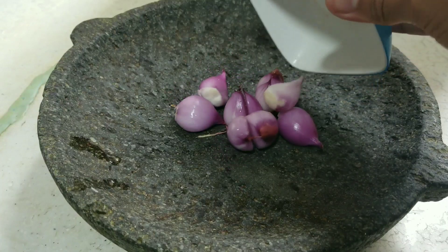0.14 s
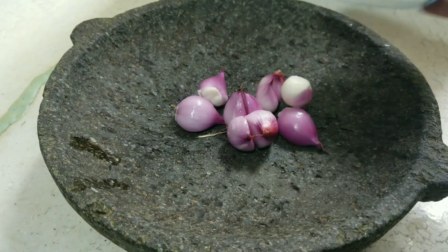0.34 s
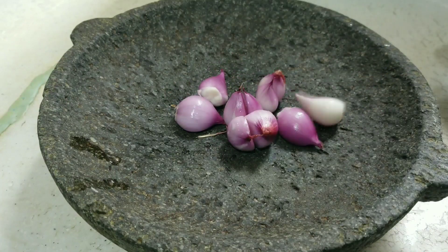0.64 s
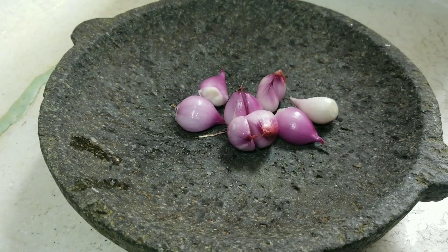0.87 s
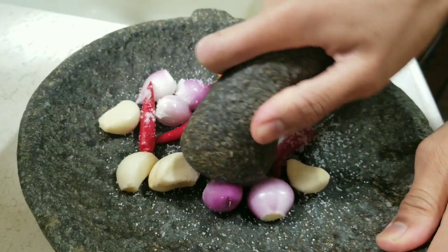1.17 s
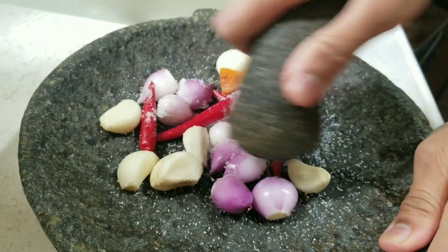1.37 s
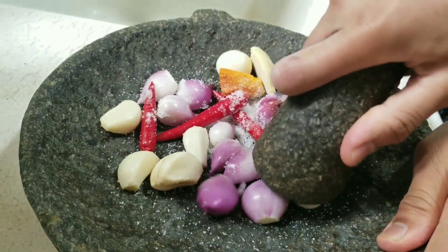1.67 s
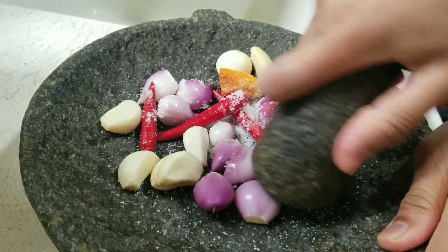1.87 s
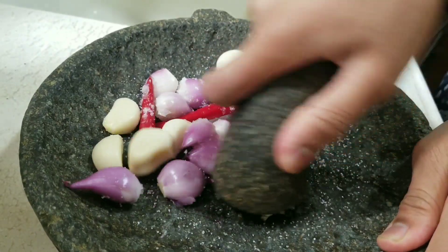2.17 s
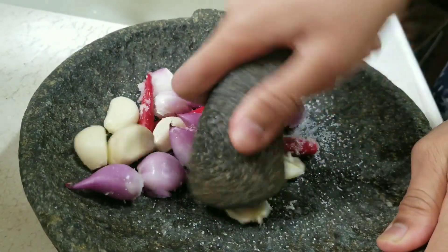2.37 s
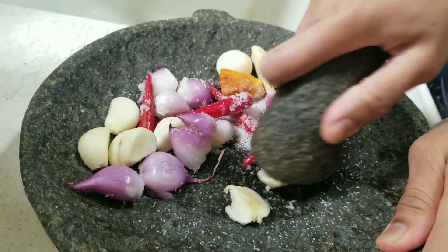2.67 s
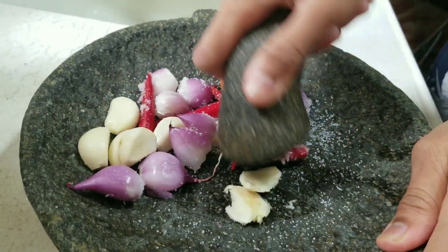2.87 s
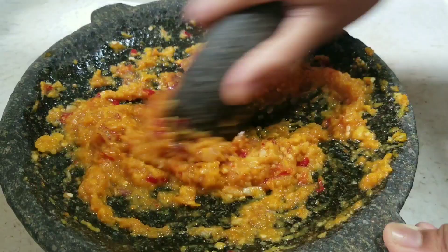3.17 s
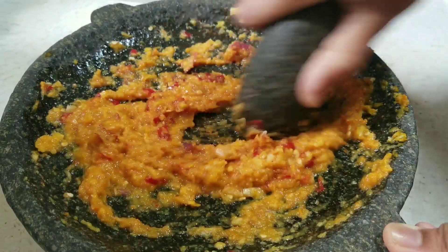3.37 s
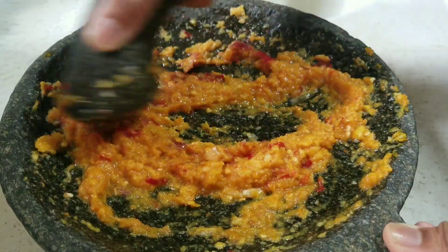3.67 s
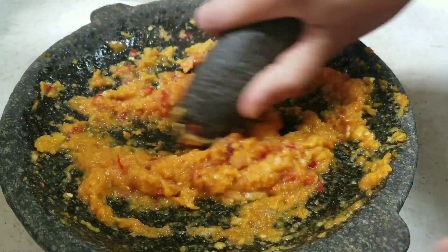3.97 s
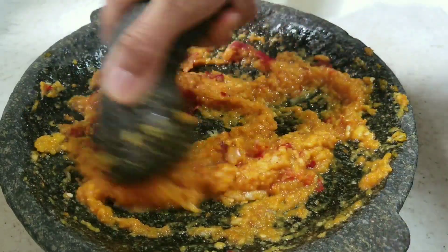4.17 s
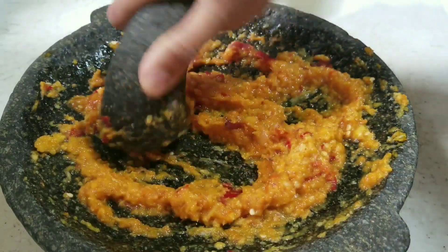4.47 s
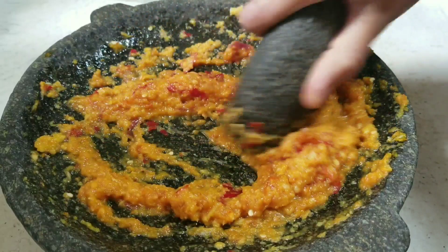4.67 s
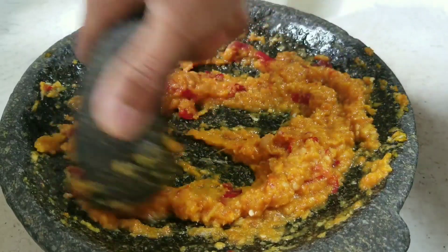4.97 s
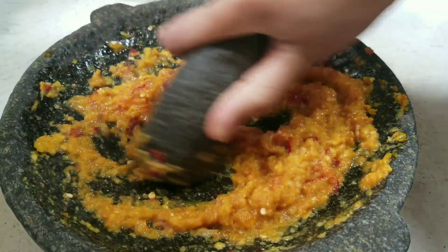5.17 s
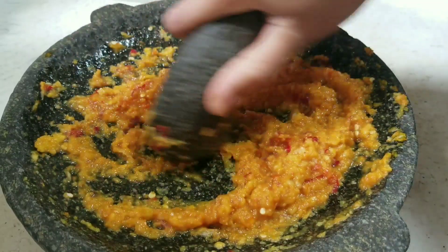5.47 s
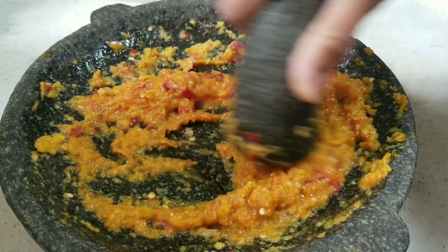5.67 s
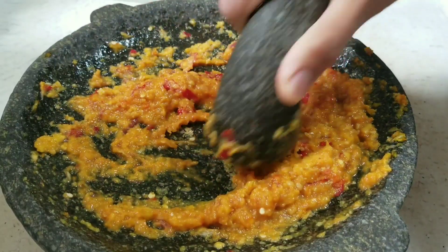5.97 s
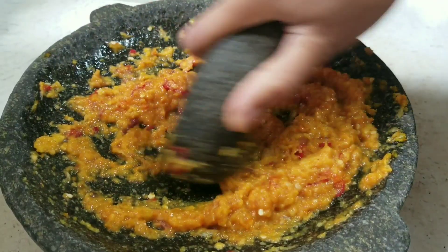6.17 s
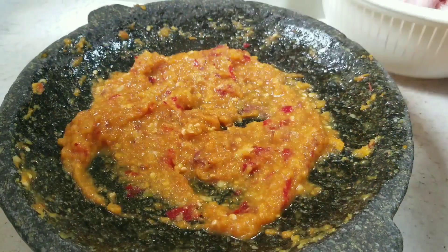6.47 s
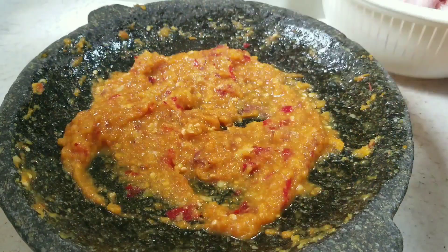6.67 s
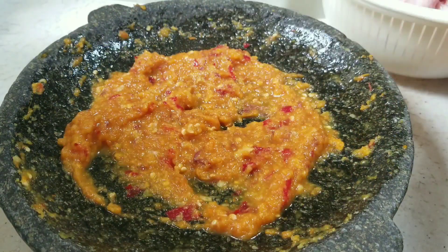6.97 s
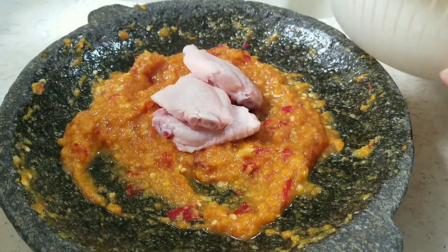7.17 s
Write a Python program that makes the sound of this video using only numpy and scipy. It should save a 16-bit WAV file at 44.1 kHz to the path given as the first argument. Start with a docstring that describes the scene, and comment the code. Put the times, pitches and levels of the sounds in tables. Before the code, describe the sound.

Crisp crushing and snapping in a stone mortar gives way to gritty, squelching grinding, ending with a soft meaty slap over low room hum.

```python
"""A kitchen counter and a shallow stone mortar, in stereo over a low, wavering room hum with faint hiss.
First papery skin brushes the stone; then a pestle crushes shallots and garlic, breaking flesh in swarms of
random fractures, with single snaps, while the heavy dish thumps and rumbles as decaying low bounces and noise.
Next it grinds wet chilli paste: grit excites stone modes, slips make the pestle squeak, noise bands squelch.
Last, the sound drops out briefly and pieces of raw chicken land with filtered slaps and dull thuds."""
import sys
import numpy as np
from scipy import signal
from scipy.fft import rfft, irfft
from scipy.io import wavfile
from scipy.ndimage import uniform_filter1d

SR = 44100
rng = np.random.default_rng(int(sys.argv[2]) if len(sys.argv) > 2 else 0)


def int16_out(signal):
    """Quantize to a 16-bit WAV file."""
    q = np.round(np.clip(np.atleast_2d(signal).T, -1, 1) * 32767)
    wavfile.write(sys.argv[1], SR, q.astype(np.int16))


N = 323253
TIME = np.arange(N) / SR


def from_db(db):
    """Decibels to gain."""
    return 10 ** (np.asarray(db) / 20)


def rms_one(x):
    """Scale to unit power."""
    return x / np.sqrt(np.mean(x ** 2) + 1e-20)


def panned(db):
    """Left and right gains for a level difference; positive is louder on the left."""
    gains = from_db(np.array([[db], [-db]]) / 2)
    return gains / np.sqrt(np.cosh(db * np.log(10) / 20))


def drift(rate):
    """Random wander of rms 1 through this many new values per second."""
    knots = rng.standard_normal(4096)
    return rms_one(np.interp(TIME * rate, np.arange(len(knots)), knots))


def convolve(x, response):
    """Pass mono or stereo sound through a mono or stereo response."""
    return signal.fftconvolve(np.atleast_2d(x), np.atleast_2d(response), axes=1)[:, :N]


def response_of(spectrum, size=8192):
    """Minimum-phase impulse response of unit energy with this spectrum, falling steeply past its ends."""
    hz, db = np.transpose(spectrum)
    octave = np.log2(np.maximum(np.fft.rfftfreq(size, 1 / SR), 1))
    known = np.log2(hz)
    outside = np.abs(octave - np.clip(octave, known[0], known[-1]))
    level_db = np.interp(octave, known, db) - np.minimum(40 * outside, 60)
    cepstrum = irfft(np.log(from_db(level_db)))
    # folding the cepstrum onto positive time makes the response causal
    cepstrum[1:size // 2] *= 2
    cepstrum[size // 2 + 1:] = 0
    response = irfft(np.exp(rfft(cepstrum)))
    return response / np.linalg.norm(response)


def coloured(x, spectrum):
    """Give an excitation a spectrum; rms 1."""
    return rms_one(convolve(x, response_of(spectrum)))


def struck(x, spectrum):
    """A unit click becomes a pulse of height 1 with this spectrum."""
    response = response_of(spectrum)
    return convolve(x, response / np.abs(response).max())


def resonance(x, hz, width):
    """Two-pole resonator with gain 1 on top; width in Hz."""
    r = np.exp(-np.pi * width / SR)
    feed = np.array([1, 0, -1]) * (1 - r * r) / 2
    feedback = [1, -2 * r * np.cos(2 * np.pi * hz / SR), r * r]
    return signal.lfilter(feed, feedback, x + 1e-18)


def ringing(x, modes, wander_db):
    """Modes share one excitation; their strengths change as the contact moves over the stone. Rms 1."""
    total = 0
    for k, (hz, width, db) in enumerate(modes):
        strength = from_db(db + wander_db * drift(35))
        total = total + (-1) ** k * strength * resonance(x, hz, width)
    return rms_one(total)


def grains(per_s, spread_db, clump_db, clump_rate):
    """Random fractures of uneven size that come in clumps; the mean power is held even."""
    unevenness_db = spread_db * np.minimum(rng.exponential(1, N), 4)
    sizes = from_db(unevenness_db + clump_db * drift(clump_rate))
    clicks = (rng.random(N) < per_s / SR) * sizes * rng.choice([-1, 1], N)
    local_power = np.abs(uniform_filter1d(clicks ** 2, size=1300))
    return clicks / np.sqrt(local_power + 1e-3)


def patchy(x, depth_db, rate):
    """Fractures of one size come in runs, so each band swells and fades on its own."""
    lows = []
    for hz in np.geomspace(1100, 13500, 9):
        lowpass = signal.butter(3, hz, fs=SR, output="sos")
        lows.append(signal.sosfiltfilt(lowpass, x + 1e-9))
    bands = np.diff([0 * x, *lows, x], axis=0)
    return sum(band * from_db(depth_db * drift(rate)) for band in bands)


def add(out, s, sound):
    """Lay a sound into a track from time s on."""
    at = int(round(s * SR))
    out[..., at:at + sound.shape[-1]] += sound[..., :N - at]


def contacts(times, levels_db, crumble_db, crumble_s):
    """Each contact is a click followed by a short, decaying crumble of noise."""
    out, t = np.zeros(N), TIME[:SR // 5]
    for s, db, rest_db in np.broadcast(times, levels_db, crumble_db):
        burst = from_db(rest_db) * rng.standard_normal(len(t)) * np.exp(-t / crumble_s)
        burst[0] = 1
        add(out, s, from_db(db) * burst)
    return out


# a push starts this far below its full level, fading in over this time
TOUCH_DB, TOUCH_S = -14, 0.0061


def push(s, attack_s, hold_s, release_s):
    """Envelope of one push: a light touch, a swell to full force, a hold, a fall of 20 dB per release time."""
    age = TIME[::16] - s
    swell_db = TOUCH_DB * np.clip(1 - age / max(attack_s, 1e-3), 0, 1)
    fall_db = 20 * np.maximum(age - attack_s - hold_s, 0) / max(release_s, 1e-3)
    return from_db(np.maximum(swell_db - fall_db, -200)) * np.clip(age / TOUCH_S + .5, 0, 1)


def pushes(rows):
    """Rows of (s, attack, hold, release, dB, ..) to one gain in time per dB column; overlaps add in power."""
    power = sum(np.outer(from_db(row[4:]), push(*row[:4])) ** 2 for row in rows)
    return [np.interp(TIME, TIME[::16], np.sqrt(layer)) for layer in power]


def wide_noise(spectrum, side_db):
    """Stereo noise with a part common to left and right and an opposed part at side_db."""
    mid, side = coloured(rng.standard_normal((2, N)), spectrum)
    return mid + from_db(side_db) * side * [[1], [-1]]


KITCHEN_T60_S, TREBLE_T60_S, WALL_ECHO_S = 0.26, 0.18, .00735


def kitchen(x, wet_db, width_db):
    """Direct sound, scatter off dish and counter that differs left and right, a wall echo and a dulling tail."""
    t = TIME[:SR // 2]
    density = .08 + t / .04
    noise = rng.standard_normal((2, len(t))) * (rng.random((2, len(t))) < density)
    low = signal.sosfilt(signal.butter(1, 3500, fs=SR, output="sos"), noise)
    tail = low * from_db(-60 * t / KITCHEN_T60_S) + (noise - low) * from_db(-60 * t / TREBLE_T60_S)
    tail *= t > .004
    response = from_db(wet_db) * tail / np.linalg.norm(tail, axis=1, keepdims=True)
    # flat spectrum with random phase
    scatter = irfft(np.exp(1j * np.angle(rfft(rng.standard_normal(128)))))
    response[:, :len(scatter)] += from_db(width_db) * scatter * [[1], [-1]]
    response[:, 0] += 1
    response[:, round(WALL_ECHO_S * SR)] += from_db(-12.5)
    return convolve(x, response / np.linalg.norm(response.mean(axis=0)))


# Low tones of the room hum. Each row: frequency in Hz, mean amplitude in dB before the background level.
HUM_TONES = [(59.2, -53), (129.2, -50), (177.6, -57), (355.3, -67)]
# Spectrum of the room rumble. Each row: frequency in Hz, relative density in dB per Hz.
RUMBLE_SPECTRUM = [(12, -51), (20, -9), (49, -5), (97, -19.5), (107, 0.5), (128, -1.5), (188, -12.5),
                   (213, -16.5), (282, -14), (352, -18), (538, -30), (584, -27.5), (1230, -36.5),
                   (1700, -33.5), (2500, -58), (3250, -105), (5500, -120)]
# Spectrum of the hiss. Each row: frequency in Hz, relative density in dB per Hz.
HISS_SPECTRUM = [(1290, -27.5), (2200, -17.5), (2500, -11), (3060, -16.5), (5240, -16), (8480, -27.5),
                 (13700, -5), (14100, -23), (15000, -2.5), (16500, -43.5)]
# How loud rumble and hum stand. Each row: time in seconds, gain in dB.
BACKGROUND_LEVEL = [(0, 3.5), (1.2, 3.5), (1.4, 4), (3.1, -4.5), (3.3, -3), (7.33, 2.5)]


def background():
    """The room: noise rumbles low, sine tones hum with wavering level and phase, and steady noise hisses."""
    waver_db, sway_rad = 2, .45
    hum = 0
    for hz, db in HUM_TONES:
        amplitude = from_db(db + waver_db * drift(12.0))
        hum = hum + amplitude * np.sin(2 * np.pi * hz * TIME + sway_rad * drift(6))
    rumble = from_db(-49.5) * wide_noise(RUMBLE_SPECTRUM, side_db=-4.5)
    hiss = from_db(-73) * wide_noise(HISS_SPECTRUM, side_db=-6.0)
    level_db = np.interp(TIME, *np.transpose(BACKGROUND_LEVEL))
    return from_db(level_db) * (rumble + hum) + hiss


# A clove rolls and its skin brushes the stone. Each row: start in seconds, level in dB.
SKIN_BRUSHES = [(0.56, -62.5), (0.9, -61.5)]
# Spectrum of papery skin. Each row: frequency in Hz, relative density in dB per Hz.
SKIN_SPECTRUM = [(5000, -26), (8500, -15), (11500, 3), (15500, -3)]


def rustle():
    """Papery skin brushes lightly over the stone: bright, tiny random touches, dry and central."""
    attack_s, release_s = 0.03, .11
    touches = coloured(grains(per_s=3300, spread_db=2, clump_db=-3, clump_rate=63), SKIN_SPECTRUM)
    level, = pushes([(s, attack_s, 0, release_s, db) for s, db in SKIN_BRUSHES])
    return level * touches


# Skins and flesh snapping, paste smacking. Each row: time in seconds, relative level in dB,
# bright edge relative to the middle crack in dB, crumble that follows relative to the click in dB.
SNAP_EVENTS = [(0.8014, -48, -15, -5.5), (0.9773, -27, -15, -17), (1.018, -11.5, -19, -12),
               (1.1462, -11.5, -30, -18), (1.3882, -30, 4, -32), (1.4705, -30.5, 4.5, -15),
               (1.506, -24, -5, -25), (1.5988, -32, 1.5, -11.5), (1.618, -24.5, -0.5, -15),
               (1.6771, -22, -24, -11), (1.75, -13.5, -1, -28), (1.8849, -10.5, -1.5, -12.5),
               (1.8929, -11.5, -18, -13), (1.907, -10.5, 0, -18.5), (2.0352, -10.5, -8.5, -15),
               (2.0477, -10, -10.5, -18), (2.116, -34, -23, -26), (2.468, -47, 9.5, -14.5),
               (2.5092, -16, -8, -25), (2.52, -22, -6, -11), (2.564, -8, -11, -27), (2.5692, -10, -15, -28),
               (2.589, -16.5, 2.5, -11), (2.7767, -41, -28, -2), (2.894, -44, 2, -16),
               (3.0494, -33, -9, -19), (3.156, -29, -21, -23), (3.8406, -50, -2, -18),
               (4.345, -27, -11, -13.5), (4.763, -40.5, 14.5, -16), (5.104, -27.5, 1.5, -14),
               (5.136, -36, 6, -22), (5.4234, -39.5, 15, -10.5), (6.186, -37, 5, -19),
               (6.783, -37.5, 0, -14), (6.8608, -29, 4, -24), (6.9527, -21, -1, -44)]
# Spectrum of tearing flesh. Each row: frequency in Hz, relative density in dB per Hz.
FLESH_SPECTRUM = [(1410, -30), (2400, -3), (2640, -9), (2960, 0.5), (3100, 0), (4150, 0.5), (4500, 4),
                  (7500, -8.5), (9750, -24), (16500, -120)]
# Spectrum of bursting cells. Each row: frequency in Hz, relative density in dB per Hz.
CELL_SPECTRUM = [(4120, -12), (7000, -9.5), (8710, -5), (12000, 0.5), (15100, -2.5), (16000, -34),
                 (16300, -40), (16500, -34)]


def snaps():
    """Single larger breaks, each a click and crumble filtered to a middle crack and a bright edge."""
    s, db, treble_db, crumble_db = np.transpose(SNAP_EVENTS)
    crack = struck(contacts(s, db - 13, crumble_db, crumble_s=0.0026), FLESH_SPECTRUM)
    edge = struck(contacts(s, db + treble_db - 1.5, crumble_db, crumble_s=.003), CELL_SPECTRUM)
    crack = kitchen(crack, wet_db=-6, width_db=-1) * panned(-7.0)
    return crack + kitchen(edge, wet_db=-10.0, width_db=-3.5)


# The pestle bears down and a piece gives way. Each row: start in seconds, attack in seconds,
# hold in seconds, release in seconds, then relative levels in dB of tearing flesh, bursting cells, dull crunch.
CRUSH_PUSHES = [(.976, 0.013, .02, .08, -53, -53, -56), (1.008, 0.027, .012, .04, -36, -37, -50),
                (1.045, 0.011, .02, .07, -41.5, -43.5, -51), (1.125, .02, .005, .118, -52, -54, -59),
                (1.383, .005, .005, .045, -60.5, -58, -71), (1.423, .017, .048, .5, -59, -54, -61.5),
                (1.499, 0.01, .012, .041, -39, -33.5, -54.5), (1.583, 0.022, .019, .016, -57, -52.5, -59),
                (1.614, 0.0035, .003, .027, -43.5, -52, -38.5), (1.664, 0.011, .01, .073, -50, -45.5, -55),
                (1.711, 0.034, .006, .07, -44.5, -35.5, -55.5), (1.875, 0.015, .045, .09, -39, -35, -43.5),
                (2.026, 0.013, .014, .069, -44.5, -41, -51), (2.1, .016, .006, .036, -47, -45.5, -66),
                (2.148, 0.037, .048, .069, -49.5, -43, -54.5),
                (2.273, 0.019, .023, .06, -60.5, -49.5, -66.5), (2.464, .004, .008, .15, -65, -57, -74),
                (2.5, 0.014, .008, .072, -49.5, -50, -54), (2.546, 0.023, .027, .049, -48, -39, -62),
                (2.61, 0.026, .04, .057, -42, -34, -53), (2.653, 0.032, .009, .03, -37.5, -32.5, -41.5),
                (2.767, 0.01, .007, .06, -59.5, -59.5, -74), (2.891, .003, .005, .1, -69, -58.5, -77),
                (2.916, 0.034, .009, .048, -59, -51.5, -60.5), (2.982, 0.037, .068, .052, -42, -35, -46)]
# Spectrum of the dull crunch. Each row: frequency in Hz, relative density in dB per Hz.
DULL_SPECTRUM = [(290, -52), (500, -10.5), (991, -3), (1070, -1.5), (1470, -0.5), (1600, 0), (2700, 4),
                 (3510, -30.5), (5940, -120)]


def crunch():
    """Cell walls break in swarms; the same fractures sound in the flesh and as a fine bright spray."""
    breaks = grains(per_s=2400, spread_db=1, clump_db=1.0, clump_rate=200)
    breaks = patchy(breaks, depth_db=3, rate=70)
    flesh, cells, dull = pushes(CRUSH_PUSHES)
    body = flesh * from_db(1.0) * coloured(breaks, FLESH_SPECTRUM) + dull * coloured(breaks, DULL_SPECTRUM)
    spray = cells * from_db(1.0) * coloured(breaks, CELL_SPECTRUM)
    # close and nearly dry
    body = kitchen(body, wet_db=-29, width_db=-1.0) * panned(-3.5)
    return body + kitchen(spray, wet_db=-29.5, width_db=-8) * panned(-.3)


# steady rumble while the pestle circles
CIRCLING_START_S, CIRCLING_END_S, CIRCLING_DB = 2.9, 5.5, -43
# rumble under a push of 0 dB; share of the push's swing in dB that it follows
ROCK_PUSH_DB, ROCK_FOLLOWS = -18, 0.47
# rumble after a thump and after a chicken landing, each against the level in its row
ROCK_BLOW_DB, ROCK_FLOP_DB = -10.5, -6.5
ROCK_ATTACK_S, ROCK_RELEASE_S = 0.013, 0.096
ROCK_LIMIT_DB = -35   # ceiling of the rumble before its final trim


def rocking():
    """The dish rumbles on the counter: steadily in circling, more under a hard push, and after each blow."""
    spectrum = [(30, -21.5), (60, -11.5), (85, 2), (115, 3.0), (140, -2.0), (190, -15), (225, -15.0),
                (257, -11.5), (310, -27.0), (500, -26.5)]   # Hz, dB per Hz
    circling_s = CIRCLING_END_S - CIRCLING_START_S
    circling, = pushes([(CIRCLING_START_S, ROCK_ATTACK_S, circling_s, ROCK_RELEASE_S, CIRCLING_DB)])
    force = pushes(GRIND_STROKES)[0] + from_db(-9.5) * pushes(CRUSH_PUSHES)[0]
    pushed = from_db(ROCK_PUSH_DB) * force ** ROCK_FOLLOWS
    blows = [(s, db + ROCK_BLOW_DB) for s, db, _, _ in DISH_THUMPS]
    blows += [(s, db + ROCK_FLOP_DB) for s, db in CHICKEN_LANDINGS]
    shaken, = pushes([(s, ROCK_ATTACK_S, 0, ROCK_RELEASE_S, db) for s, db in blows])
    level = np.sqrt(circling ** 2 + shaken ** 2 + pushed ** 2)
    level = np.minimum(level, from_db(ROCK_LIMIT_DB))
    return level * from_db(-1.5) * wide_noise(spectrum, side_db=-7.0)


# The dish knocked against the counter. Each row: time in seconds, relative level in dB, pitch in Hz,
# left-over-right level difference in dB.
DISH_THUMPS = [(1.035, -19, 146, -13), (1.392, -23.5, 73, -11), (1.505, -24, 111, -2),
               (1.619, -10, 154, -14), (1.671, -24.5, 149, -22), (1.755, -24, 145, -17),
               (1.876, -18.5, 143, 3.5), (3.007, -26.5, 93, -2), (3.699, -19.5, 75.6, -0.5),
               (3.794, -26, 96, -1), (3.813, -28.5, 101, -4), (4.308, -32, 69.4, -3), (4.643, -24, 115, 4),
               (4.922, -23.5, 87, 0), (4.944, -27, 103, 1), (4.995, -30, 103, 20), (5.026, -26, 110, -2),
               (5.25, -21.5, 113, 7), (5.303, -20, 99, 1), (5.419, -28.5, 104, -1), (6.358, -26, 94.5, 1),
               (6.76, -19, 103.6, 3.5), (6.811, -21.5, 110, 3)]
# Counter and room booming after a thump. Each row: frequency in Hz, relative level in dB, t60 in seconds.
COUNTER_BOOM = [(82.2, 3, 1), (107.6, -1.5, 0.31), (135.2, -7, 0.49), (184, -24, 0.45), (248.3, 3, 0.21)]


def thumps():
    """The heavy dish bounces on the counter for two or three cycles and leaves it booming."""
    out, t = np.zeros((2, N)), TIME[:SR // 5]
    for s, db, hz, pan in DISH_THUMPS:
        lag_s = 0.0014 + 0.0031 * np.clip((hz - 100) / 40, 0, 1)   # higher bounces reach the left later
        age = np.maximum(t - lag_s * np.array([[1], [0]]), 0)
        swell = age / 0.0061
        bounce = (swell * np.exp(1 - swell)) ** 1.41 * np.sin(2 * np.pi * hz * age)
        add(out, s, -from_db(db - 1.0) * panned(pan) * bounce)
    # the whole counter top sags and springs back slowly under each blow
    sag = from_db(-9) * resonance(out.mean(axis=0), 42, 32)
    boom = 0
    for hz, db, t60_s in COUNTER_BOOM:
        boom = boom + from_db(db) * resonance(out, hz, np.log(1000) / (np.pi * t60_s))
    return out + sag + from_db(5.5) * boom


# The pestle bottoms out on a cushion of flesh or paste. Each row: time in seconds, relative level in dB.
CUSHIONED_BLOWS = [(1.462, -36), (1.619, -25.5), (1.883, -23.5), (3.703, -32), (4.33, -40), (4.925, -34.5),
                   (6.765, -30)]
# Spectrum of its dull thud. Each row: frequency in Hz, relative density in dB.
THUD_SPECTRUM = [(140, -4), (220, 1.5), (300, -2), (420, -10.5), (600, -28.5)]


def thuds():
    """A cushioned blow gives a hollow thud without a clack."""
    s, db = np.transpose(CUSHIONED_BLOWS)
    blows = contacts(s, db, crumble_db=-50, crumble_s=.004)
    return kitchen(struck(blows, THUD_SPECTRUM), wet_db=-9, width_db=-3) * panned(-6)


# The pestle striking bare stone. Each row: time in seconds, relative level in dB.
STONE_KNOCKS = [(1.619, -19), (2.683, -22.5), (3.155, -36), (3.377, -27), (4.636, -29), (5.003, -21.5),
                (5.115, -57), (6.304, -24), (6.785, -41)]
# Spectrum of stone on stone. Each row: frequency in Hz, relative density in dB per Hz.
KNOCK_SPECTRUM = [(150, 1), (330, -4), (600, -7.5), (1100, 6), (1500, 5), (1950, 2), (2600, -4.5),
                  (5000, -13), (16000, -30.5)]


def knocks():
    """Stone on stone: a click and brief crumble filtered to a short, dry clack."""
    s, db = np.transpose(STONE_KNOCKS)
    clacks = struck(contacts(s, db - 6, crumble_db=-21, crumble_s=0.0045), KNOCK_SPECTRUM)
    return kitchen(clacks, wet_db=-9, width_db=-2.5) * panned(-2.1)


# The pestle is pushed through the paste. Each row: start in seconds, attack in seconds, hold in seconds,
# release in seconds, then relative levels in dB of stone rasp, gritty scrape, wet squelch.
GRIND_STROKES = [(3.207, 0.033, 0.21, 0.46, -65.5, -67, -60.5),
                 (3.374, 0.009, 0.041, 0.081, -45, -54.5, -57), (3.674, .05, 0.12, 0.18, -61.5, -66.5, -56),
                 (3.925, 0.025, 0.021, 0.096, -49, -60, -59.5),
                 (3.99, 0.0053, 0.017, 0.41, -66, -61.5, -60.5),
                 (4.19, 0.037, 0.053, 0.95, -61, -62.5, -56), (4.328, .018, 0.014, .051, -48.5, -55, -50.5),
                 (4.58, 0.074, 0.029, .1, -50, -57.5, -53.5), (4.628, .008, 0.009, 0.068, -44.5, -60, -66),
                 (4.903, 0.054, 0.036, 0.1, -55.5, -60, -54),
                 (4.996, 0.0038, 0.0097, 0.062, -41.5, -58.5, -51),
                 (5.091, 0.021, 0.018, 0.057, -46.5, -52, -50), (5.193, 0.017, 0.18, .097, -64, -67.5, -71),
                 (5.373, 0.017, 0.014, .14, -60.5, -61, -54.5), (6.114, 0.047, 0.038, 0.077, -40, -50, -51),
                 (6.267, 0.027, 0.069, 0.049, -38.5, -51.5, -52.5),
                 (6.403, 0.045, 0.015, .12, -55, -59.5, -57), (6.775, .018, 0.018, 0.04, -40, -61, -66),
                 (6.897, 0.042, 0.03, 0.12, -61, -56, -54)]
# Paste squeezes out from under the pestle. Each row: start in seconds, attack in seconds,
# release in seconds, relative level in dB.
PASTE_SQUEEZES = [(3.829, 0.016, 0.029, -59.5), (4.5, 0.041, 0.048, -54.5), (4.758, 0.0044, 0.047, -53),
                  (5.239, 0.018, 0.074, -45.5), (5.418, 0.012, 0.067, -53), (5.718, 0.039, 0.066, -60.5),
                  (5.965, 0.021, 0.089, -59), (6.475, 0.019, 0.039, -49), (6.728, 0.061, 0.17, -51.5),
                  (6.819, 0.037, 0.029, -48), (6.936, 0.021, 0.028, -46.5)]
# Spectrum of pestle rubbing on dish. Each row: frequency in Hz, relative density in dB per Hz.
RASP_SPECTRUM = [(220, -21), (380, -5), (443, -24), (512, -6), (573, -3.5), (737, -1), (893, 1),
                 (1020, -2.5), (1100, 2), (1270, -4), (1390, -3), (1610, -11), (1770, -10.5), (1850, -6),
                 (2400, -35.5), (4070, -120)]
# Broad low modes of the dish, struck by grit. Each row: frequency in Hz, width in Hz, relative level in dB.
DISH_MODES = [(515, 56, 2.5), (643, 41, 5), (749, 61, 3.5), (943, 41, 4), (1096, 48, 2), (1223, 180, -10)]
# Upper modes of the rubbed stone. Each row: frequency in Hz, width in Hz, relative level in dB.
STONE_MODES = [(2760, 70, -13), (3640, 85, 1), (4590, 110, -4), (5040, 80, -14), (6280, 150, -6)]
# Spectrum of wet paste smacking under the pestle. Each row: frequency in Hz, relative density in dB per Hz.
SMACK_SPECTRUM = [(2200, -0.5), (3000, -2.5), (3900, 3), (5000, 4), (6300, 2), (7400, -3)]
# Spectrum of the squelch. Each row: frequency in Hz, relative density in dB per Hz.
SQUELCH_SPECTRUM = [(4000, -15.5), (6800, -2.5), (7300, -4), (7890, 0), (13300, 7), (15800, -0.5),
                    (16300, -24), (16500, -47)]
SQUELCH_SMACK_DB = -9.5   # the smack that goes with each squeeze
LUMPS_DB, LUMPS_PER_S = 2, 45   # lumps in the paste make the squelch uneven


def grinding():
    """Grit catches between stone and stone and rings their modes, while the paste squelches."""
    rasp, scrape, wet = pushes(GRIND_STROKES)
    squeezed, = pushes([(s, attack_s, 0, release_s, db) for s, attack_s, release_s, db in PASTE_SQUEEZES])
    scrape = np.hypot(scrape, from_db(SQUELCH_SMACK_DB) * squeezed)
    wet = np.hypot(wet, squeezed)

    grit = grains(per_s=2500, spread_db=5.0, clump_db=4, clump_rate=200)
    coarse_grit = grains(per_s=600, spread_db=-2.5, clump_db=11, clump_rate=160)
    rubbing = from_db(-1.5) * coloured(grit, RASP_SPECTRUM)
    dish = rasp * (rubbing + from_db(-5) * ringing(coarse_grit, DISH_MODES, wander_db=2.5))

    bubbles = grains(per_s=1800, spread_db=-2.0, clump_db=1.0, clump_rate=91)
    bubbles = patchy(bubbles, depth_db=4.5, rate=55)
    # only a hard stroke reaches bare stone and makes it ring; a cushion of paste just smacks
    bare = .92 * rasp ** 2 / (rasp ** 2 + from_db(-53) ** 2)
    stone = np.sqrt(bare) * ringing(grit, STONE_MODES, wander_db=-5.0)
    smack = np.sqrt(1 - bare) * coloured(bubbles, SMACK_SPECTRUM)
    scraping = scrape * from_db(1.9) * (stone + smack)
    lumps = from_db(LUMPS_DB * drift(LUMPS_PER_S))
    squelch = wet * lumps * coloured(bubbles, SQUELCH_SPECTRUM)

    dish = kitchen(dish, wet_db=-14.5, width_db=-1.0) * panned(-4.0)
    scraping = kitchen(scraping, wet_db=-11, width_db=1.0) * panned(-4.5)
    return dish + scraping + kitchen(squelch, wet_db=-12, width_db=-23) * panned(-0.95)


# The pestle rings as it sticks and slips. Each row: start in seconds, hold in seconds,
# relative level in dB, starting pitch in Hz.
PESTLE_SQUEAKS = [(3.315, .008, -53.5, 1950), (3.363, 0.057, -53.5, 1985), (3.681, .003, -58, 2010),
                  (3.73, 0.063, -56, 1966), (4, 0.019, -48.5, 2000), (4.21, .005, -53, 1905),
                  (4.274, 0.0093, -49, 1880), (4.361, 0.013, -59.5, 1960), (4.619, 0.022, -52, 1980),
                  (4.925, 0.038, -54.5, 1910), (4.994, 0.0027, -37.5, 1923), (5.025, .003, -60, 1960),
                  (5.11, .005, -56, 1930), (6.201, .006, -43.5, 1864), (6.255, .01, -52, 1866),
                  (6.29, 0.0023, -33.5, 1898), (6.343, 0.01, -49, 1865), (6.776, 0.012, -43.5, 1945),
                  (6.987, 0.0051, -53, 1926)]
SQUEAK_ATTACK_S, SQUEAK_RELEASE_S, SQUEAK_SAG_HZ_PER_S = 0.014, 0.034, 380


def squeaks():
    """Slips excite the pestle's lowest mode; its pitch is set by the grip and sags as the contact slides on."""
    starts, _, _, pitches = np.transpose(PESTLE_SQUEAKS)
    latest = np.maximum(np.searchsorted(starts, TIME) - 1, 0)
    sliding_s = np.clip(TIME - starts[latest] - SQUEAK_ATTACK_S, 0, .15)
    pitch = pitches[latest] - SQUEAK_SAG_HZ_PER_S * sliding_s
    turn = np.exp(2j * np.pi * np.cumsum(pitch) / SR)
    slips = grains(per_s=1300, spread_db=1, clump_db=-6.5, clump_rate=74)
    # shifted down by the moving pitch, low-passed, shifted back: a resonance that glides
    width_hz, skirt_hz = 55, 280
    swing = slips / turn
    for hz in (width_hz, skirt_hz):
        swing = signal.sosfilt(signal.butter(1, hz / 2, fs=SR, output="sos"), swing)
    local_power = np.abs(uniform_filter1d(np.abs(swing) ** 2, size=1100))
    swing /= np.sqrt(local_power + 1e-12)
    rows = [(s, SQUEAK_ATTACK_S, hold_s, SQUEAK_RELEASE_S, db) for s, hold_s, db, _ in PESTLE_SQUEAKS]
    level, = pushes(rows)
    ring = level * from_db(0.6) * rms_one((swing * turn).real)
    return kitchen(ring, wet_db=-11, width_db=0.5) * panned(-4.5)


# Chicken landing in the paste. Each row: time in seconds, relative level in dB.
CHICKEN_LANDINGS = [(7.154, -35), (7.196, -26)]
# Spectrum of the wet slap. Each row: frequency in Hz, relative density in dB per Hz.
SLAP_SPECTRUM = [(40, -19), (110, 20), (300, -7.5), (600, -9.5), (1500, -18.5), (2500, -14.5), (4500, -22),
                 (6000, -34.5), (16000, -68)]


def chicken():
    """Soft meat lands right of centre with a wet slap and a dull thud, then settles in a short crumble."""
    s, db = np.transpose(CHICKEN_LANDINGS)
    slaps = struck(contacts(s, db - 5.0, crumble_db=-19.5, crumble_s=0.026), SLAP_SPECTRUM)
    landings = contacts(s + .003, db, crumble_db=-60, crumble_s=.001)
    thud_spectrum = [(50, -7), (110, 5), (280, -5.0), (450, -4.0), (700, -18)]   # Hz, dB
    dull_thuds = struck(landings, thud_spectrum)
    return kitchen(slaps + from_db(-0.5) * dull_thuds, wet_db=-4.5, width_db=1.0) * panned(-9.0)


def scene():
    """All that happens in and around the mortar."""
    crushing = rustle() + snaps() + crunch()
    dish = rocking() + thumps() + thuds()
    rubbing = knocks() + grinding() + squeaks()
    return background() + crushing + dish + rubbing + chicken()


DROPOUT_START_S, DROPOUT_END_S = 7.083, 7.106
CUTOFF_HZ = 16400


def record(dry):
    """The sound drops out for a moment before the chicken lands; a steep low-pass cuts the top."""
    live = 1.0 * ((TIME < DROPOUT_START_S) | (TIME > DROPOUT_END_S))
    live = uniform_filter1d(live, size=30)   # softens the edges of the gap
    lowpass = signal.ellip(12, .1, 80, CUTOFF_HZ, fs=SR, output="sos")
    return signal.sosfilt(lowpass, dry * live)


dry = scene()
out = record(dry)
int16_out(out)
```